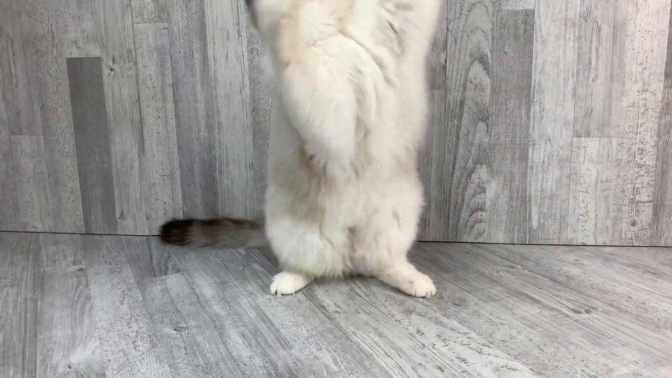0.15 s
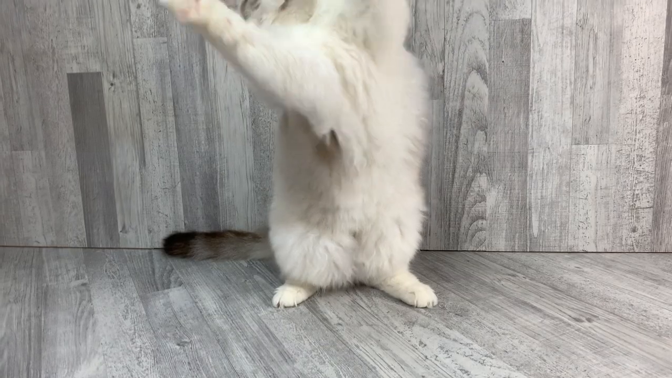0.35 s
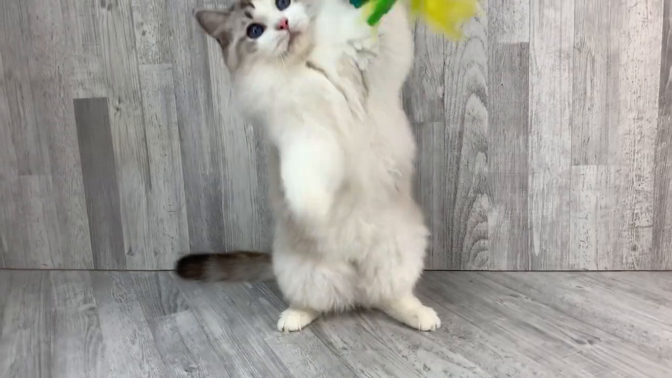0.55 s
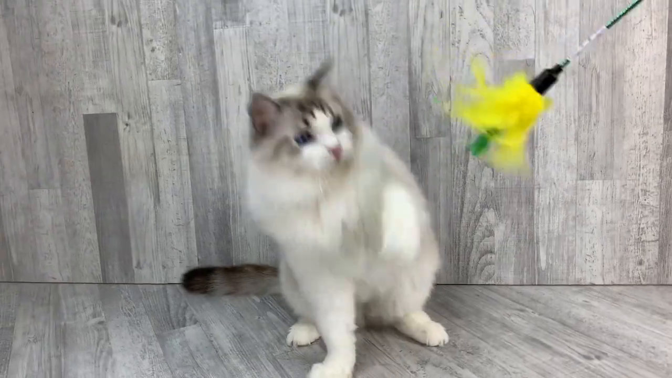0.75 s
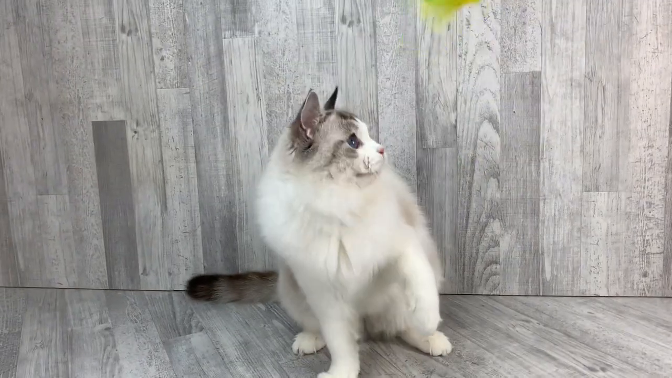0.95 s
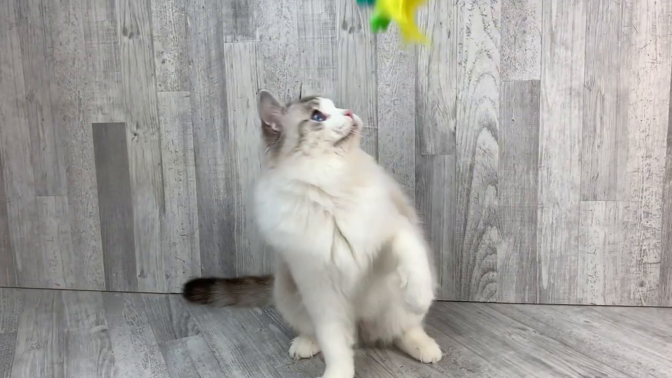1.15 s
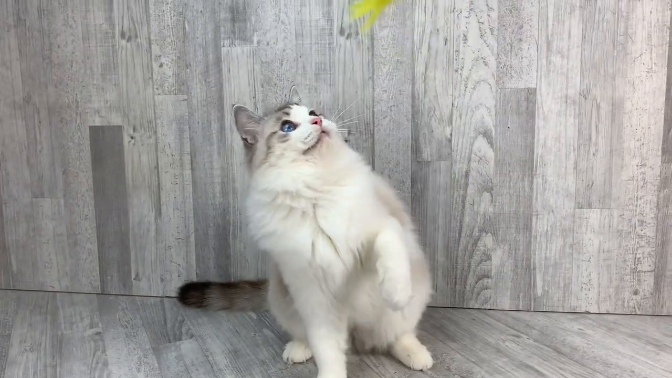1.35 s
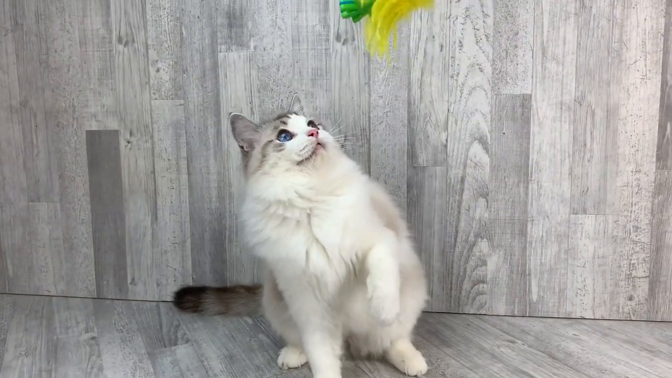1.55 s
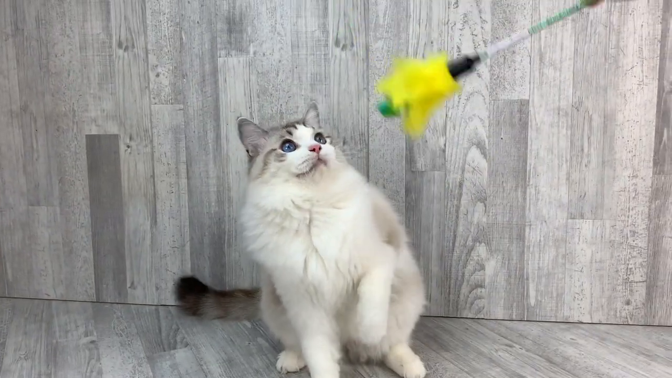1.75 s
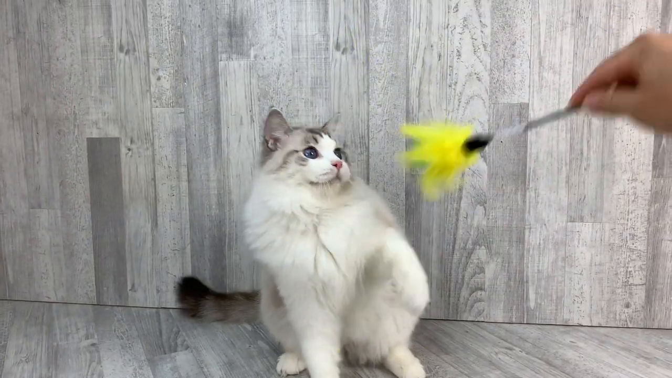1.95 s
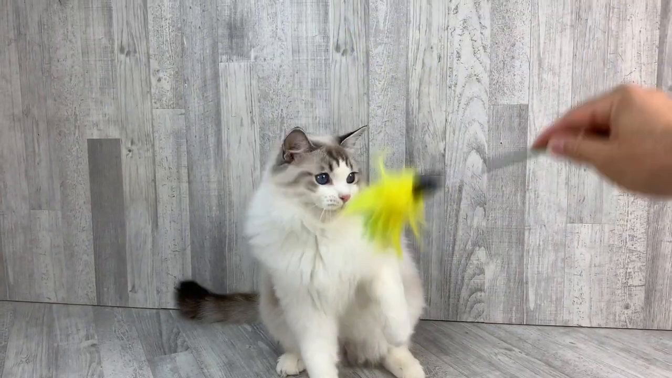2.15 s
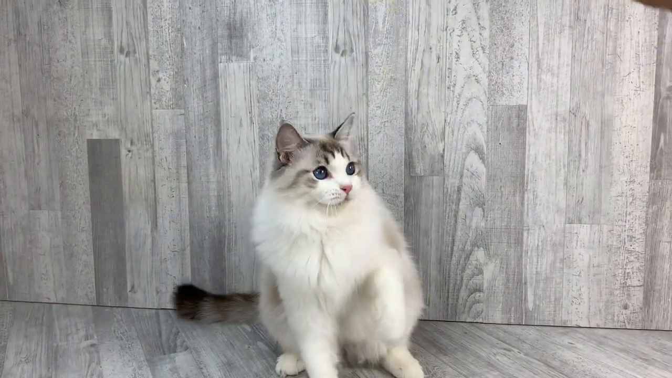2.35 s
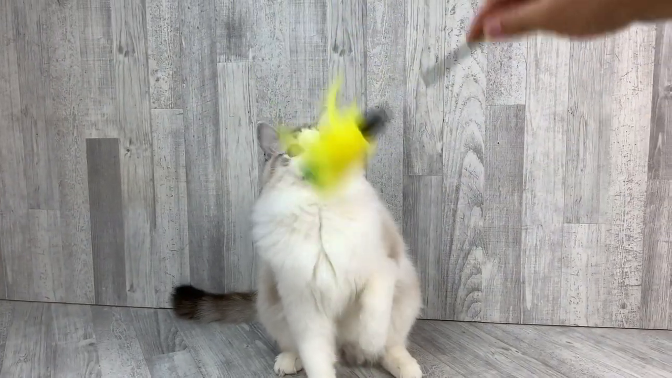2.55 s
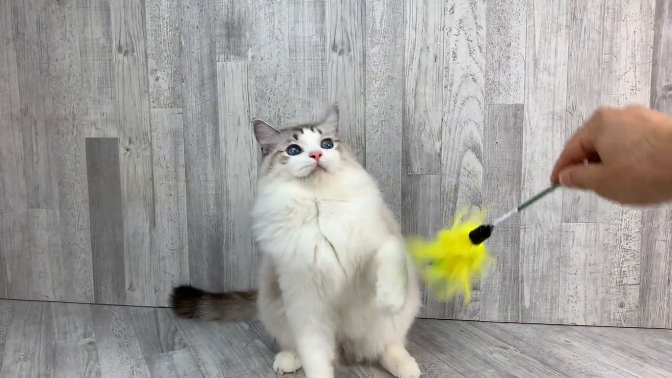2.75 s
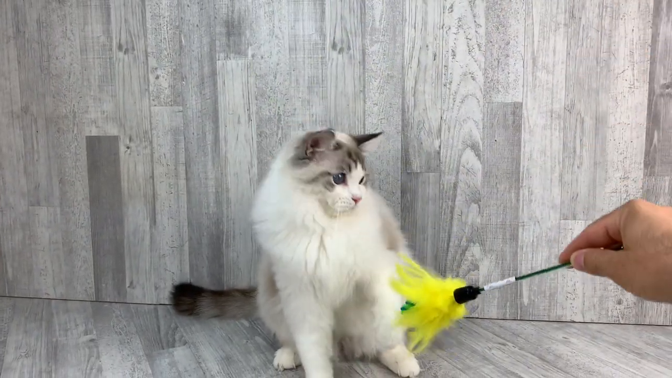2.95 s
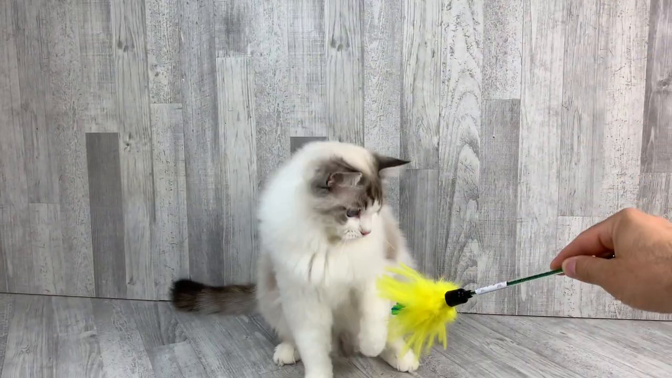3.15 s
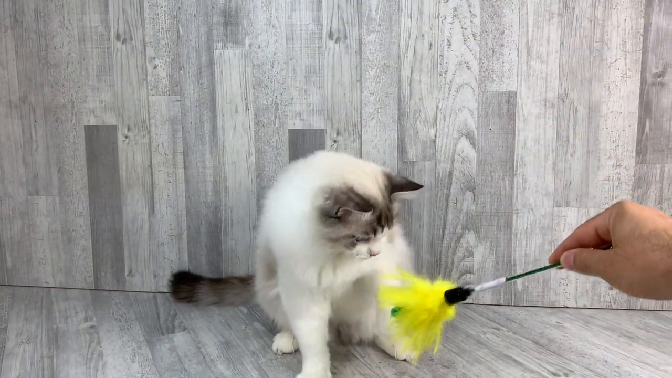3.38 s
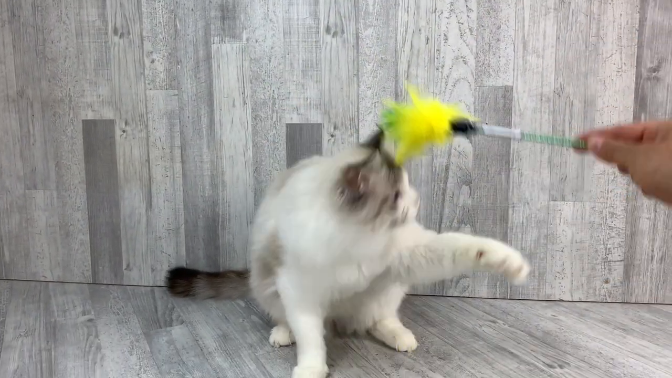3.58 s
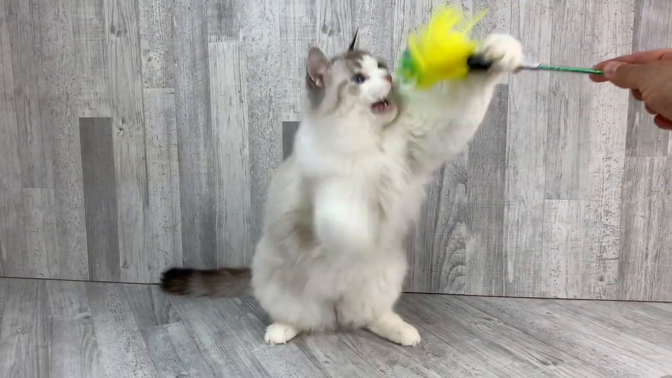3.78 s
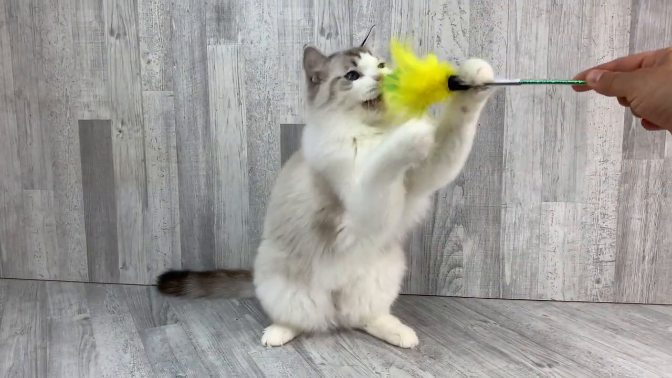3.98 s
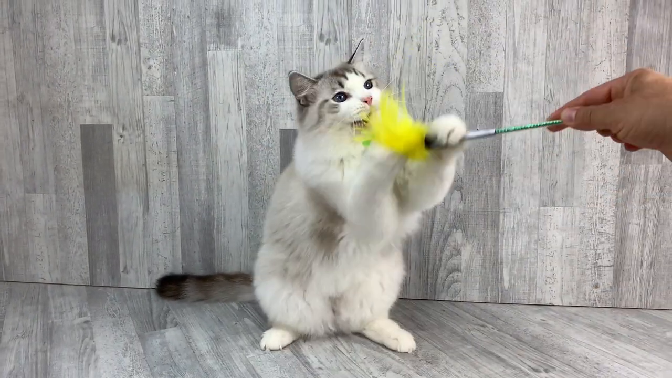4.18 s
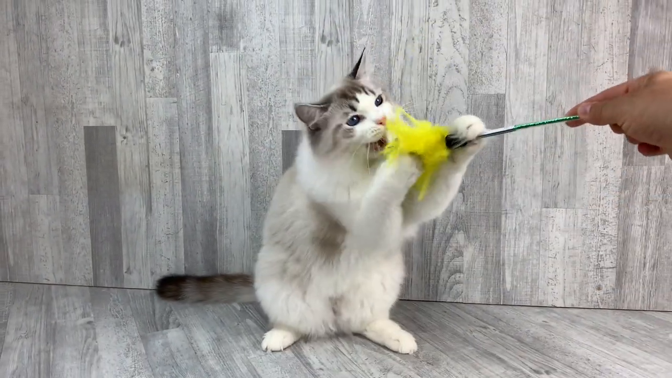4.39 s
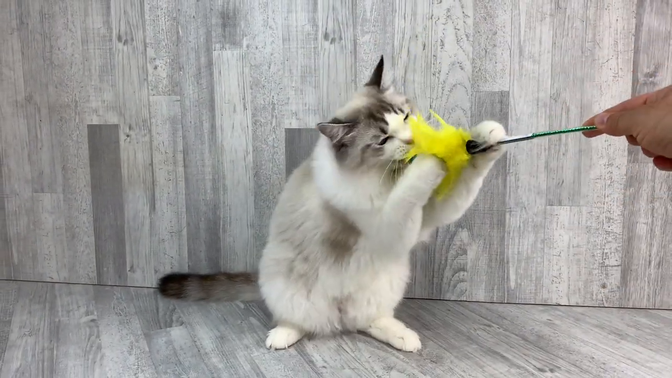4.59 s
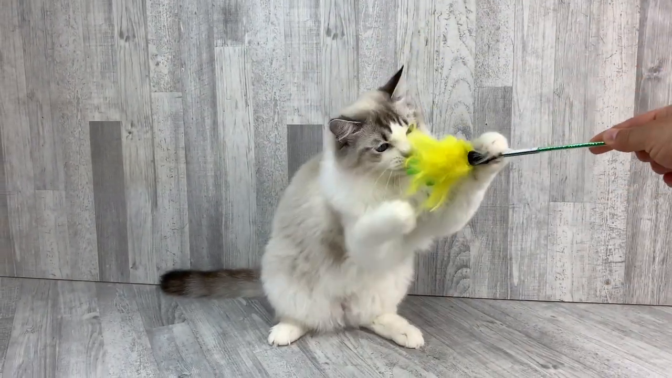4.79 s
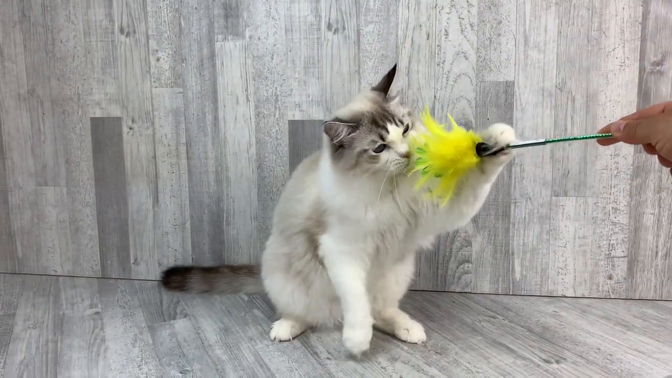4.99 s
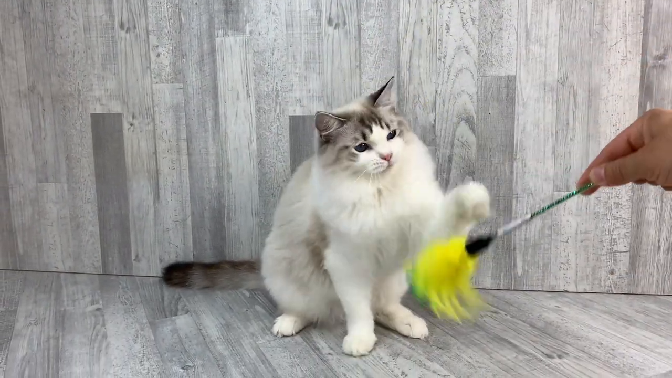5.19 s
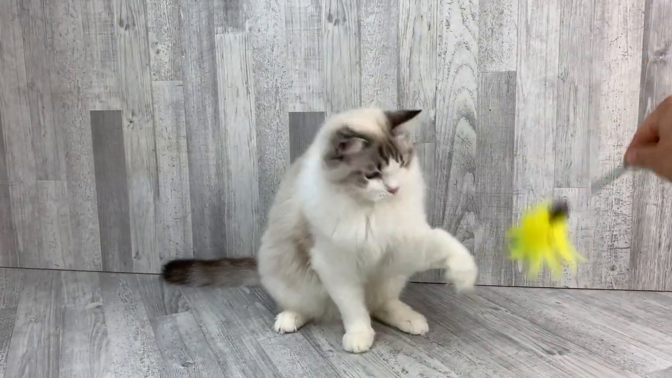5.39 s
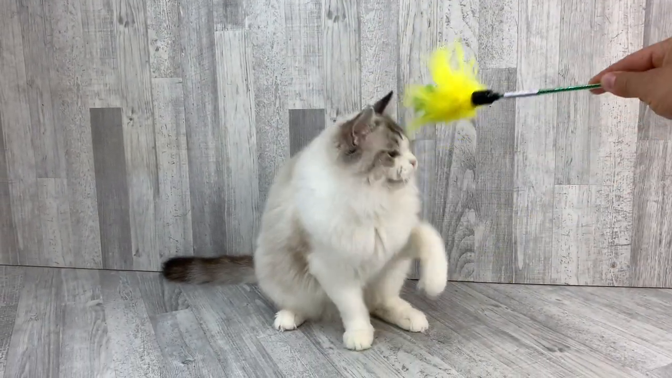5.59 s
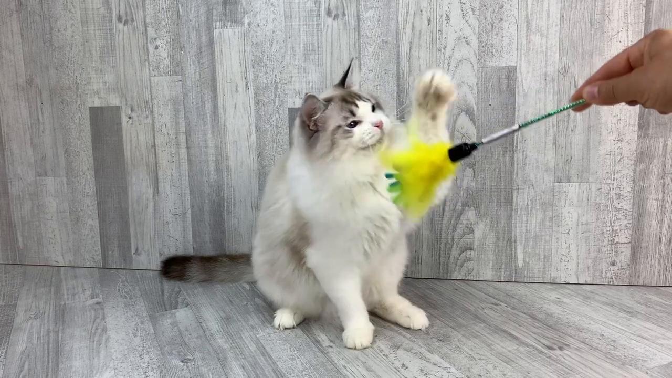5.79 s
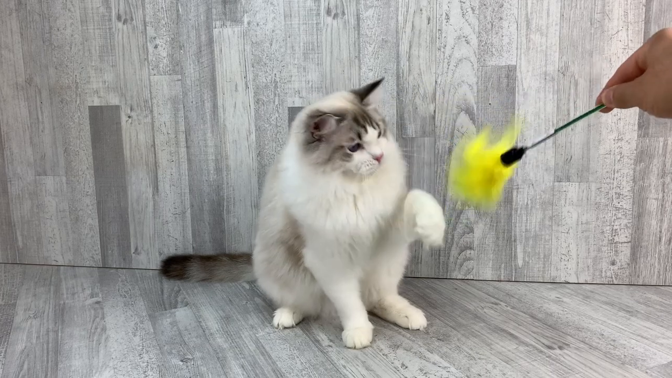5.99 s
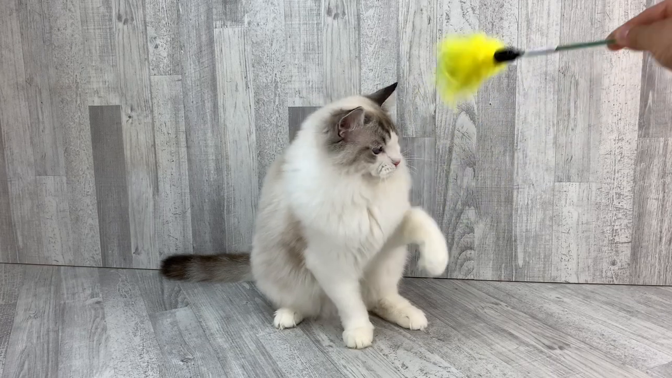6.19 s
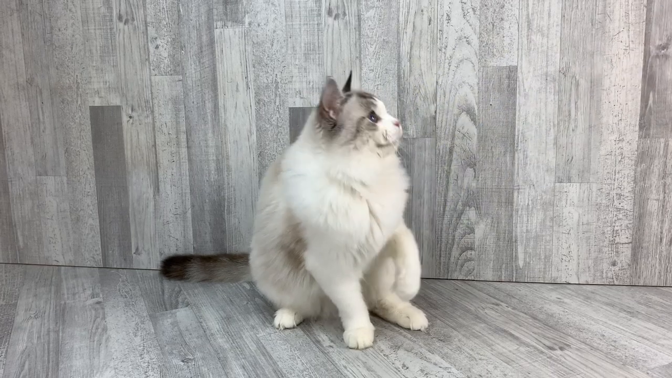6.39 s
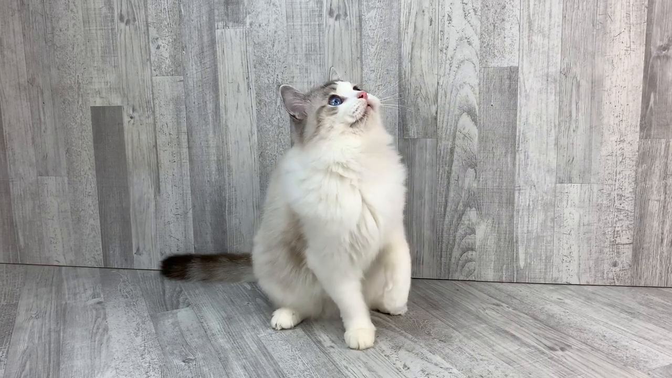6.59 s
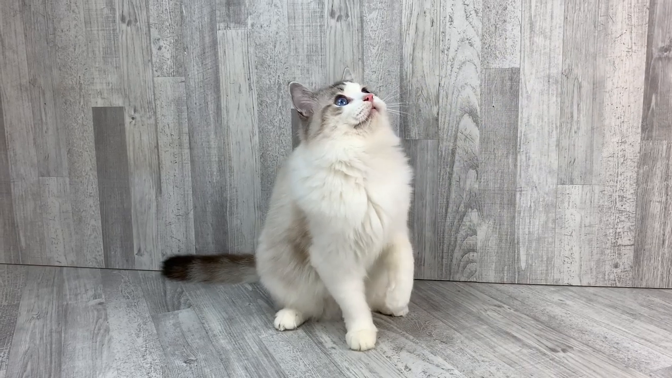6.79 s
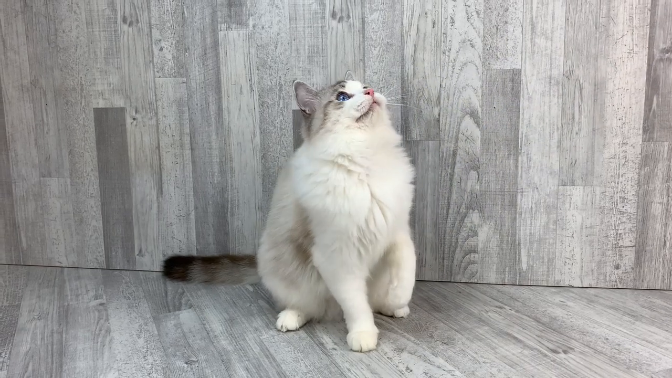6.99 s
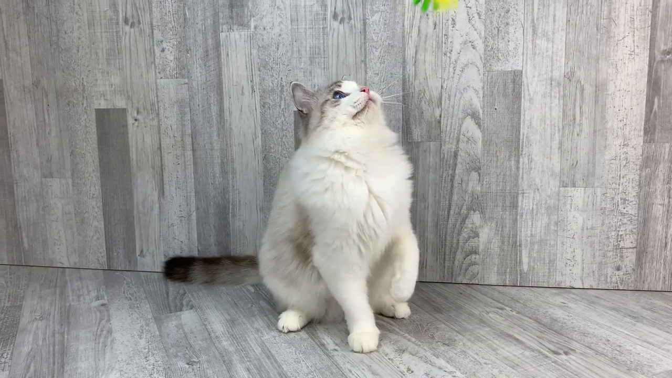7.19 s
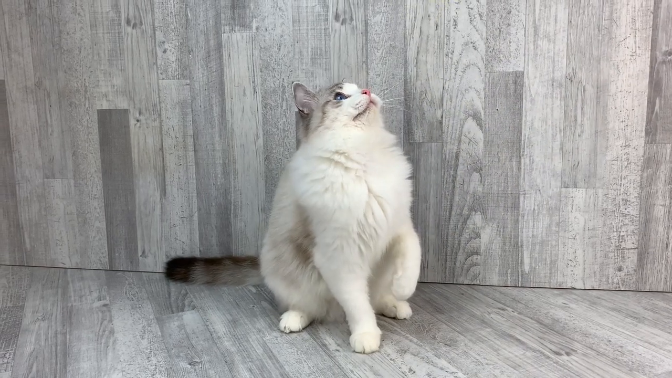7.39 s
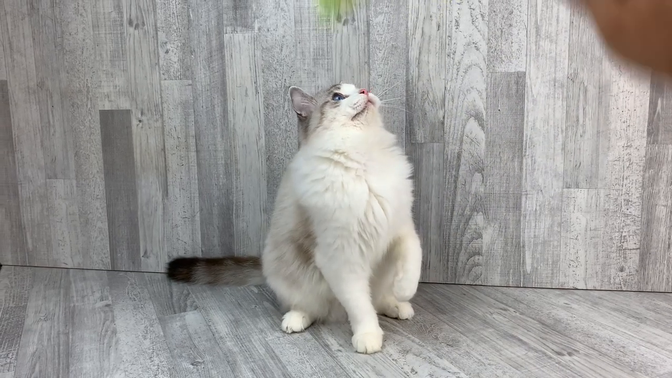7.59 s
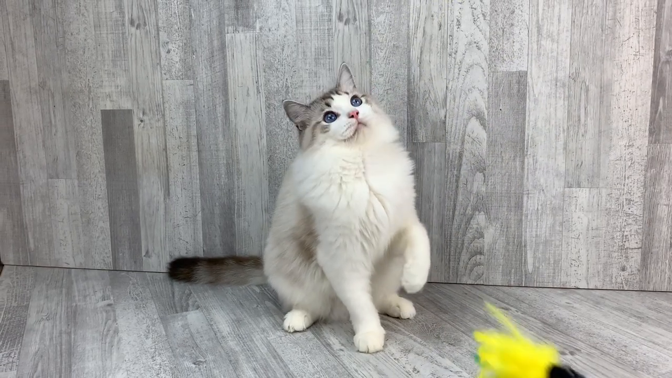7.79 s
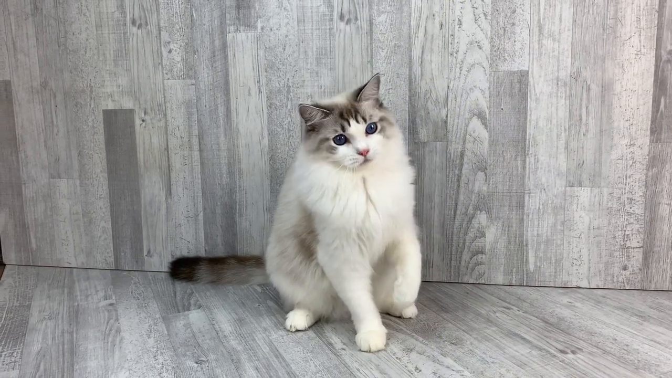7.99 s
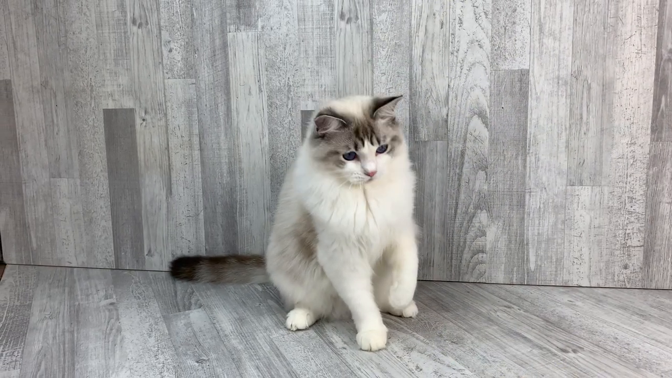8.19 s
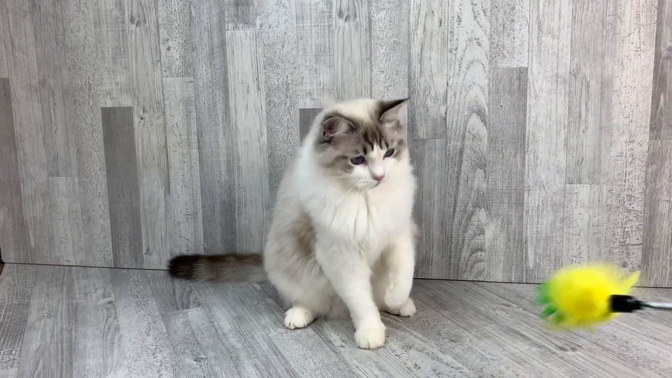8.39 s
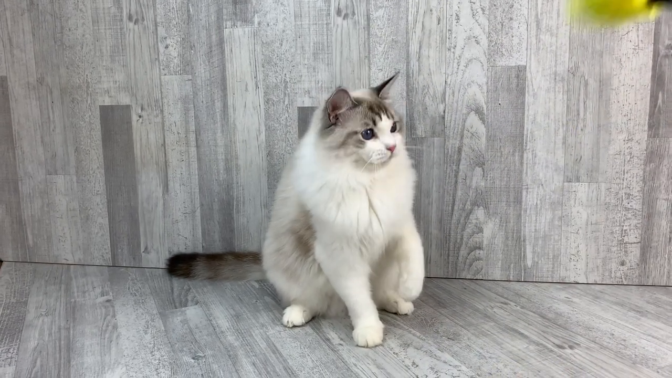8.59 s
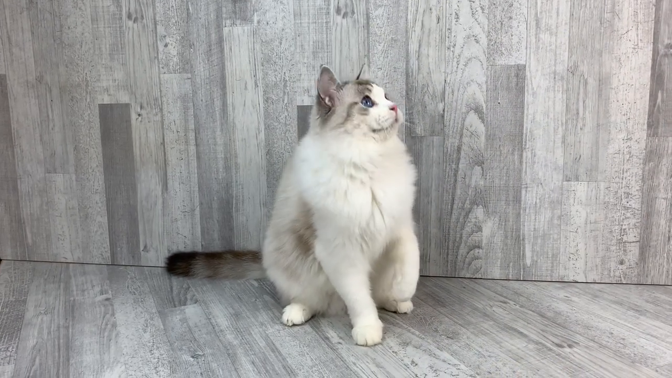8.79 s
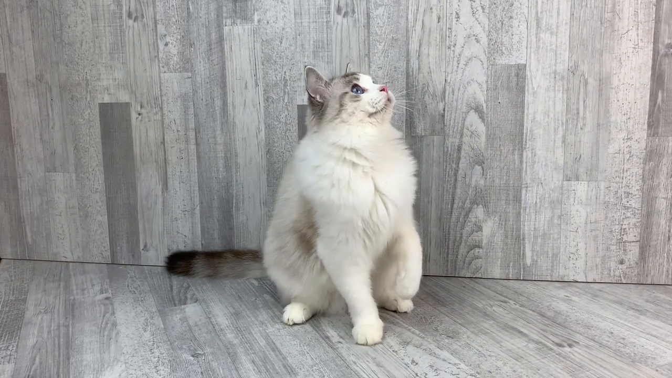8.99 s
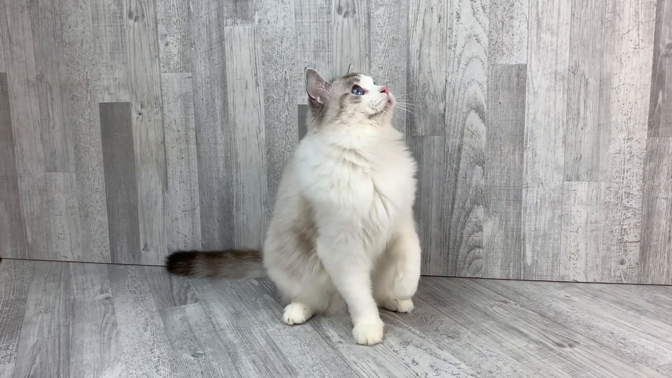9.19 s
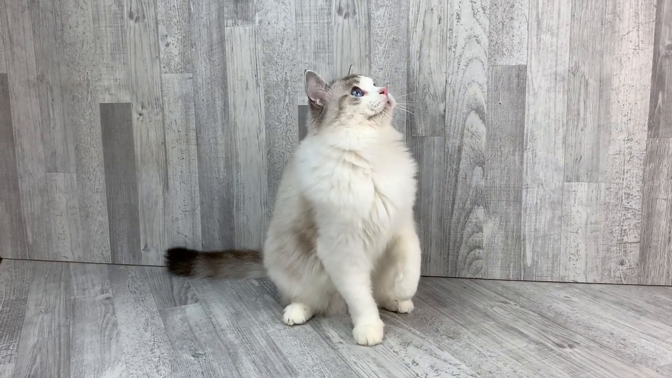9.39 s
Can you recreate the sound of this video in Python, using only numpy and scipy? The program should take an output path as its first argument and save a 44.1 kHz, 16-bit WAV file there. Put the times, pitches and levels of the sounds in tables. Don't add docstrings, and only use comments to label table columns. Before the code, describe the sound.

Bright, dry plastic clicks come in fast, uneven runs separated by small pauses. An early paw thud lands softly on the boards; around the middle, the clicks turn sparse and faint as the toy is held, then resume crisply. A short feather swish precedes the last bout. Very low house hum and a small room's quick reflections surround the close stereo pickup.

```python
import sys
import numpy as np
from scipy import signal
from scipy.fft import rfft, irfft
from scipy.io import wavfile
from scipy.ndimage import uniform_filter1d, minimum_filter1d

SR = 44100
rng = np.random.default_rng(int(sys.argv[2]) if len(sys.argv) > 2 else 0)


def dump(signal):
    limited = np.clip(np.atleast_2d(signal).T, -1, 1)
    pcm = np.round(limited * 32767).astype(np.int16)
    wavfile.write(sys.argv[1], SR, pcm)


def invert_db(level):
    return 10 ** (np.asarray(level, dtype=float) / 20)


N = 416744

# time in seconds, level in dB.
FLOOR_RUMBLE = [(0.0, -63), (0.5, -74), (0.55, -62), (0.73, -66.5), (0.839, -47.5), (1.42, -79.5),
                (3.45, -72.5), (3.79, -60.5), (5.0, -80), (5.161, -67.5), (5.53, -81.5), (5.69, -66),
                (6.421, -83), (6.55, -63.5), (7.37, -86.5), (7.68, -69), (8.29, -80), (9.45, -80.5)]
# centre in Hz, width in Hz.
HUM_BANDS = [(107, 3), (166, 35)]
# start in seconds, length in seconds, low hum in dB, upper hum in dB.
HUM_SWELLS = [
    (1.451, 0.675, -92.5, -75.5),
    (2.92, 1.66, -68.5, -76.5),
    (3.346, 0.818, -60.5, -63.5),
    (4.605, 0.96, -88, -73),
    (7.504, 0.339, -88.5, -73),
    (7.899, 0.27, -93.5, -71.5),
    (9.048, 0.198, -92, -74.5),
    (2.745, 0.305, -71.5, -75),
]
# start in seconds, length in seconds, level in dB.
SLEEVE_MOVES = [(0.05, 0.205, -74.5), (.7, 0.362, -62.5), (.85, 0.607, -70.5), (2.0, 0.367, -68.5),
                (2.3, 0.436, -76), (2.75, .32, -73), (3.25, 0.29, -91), (7.1, 0.68, -89),
                (3.65, 0.37, -64.5), (5.1, 0.279, -61), (5.25, 0.6, -78), (5.7, 0.68, -65.5),
                (6.8, 0.407, -75), (7.55, 0.421, -70), (7.95, 0.0953, -58.5), (8.4, 0.404, -71.5)]
# frequency in Hz, density in dB per Hz.
AIR_COLOUR = [(240, -41), (400, -15.5), (474, -16), (520, -13), (616, -10), (826, -19.5), (964, -15),
              (1560, -13.5), (9180, -24.5), (11000, -17.5), (16000, -35.5)]
# start in seconds, level in dB, pitch in Hz.
THUDS = [
    (0.538, -56.5, 53.2),
    (0.779, -49, 212),
    (0.8, -42, 77),
    (0.835, -46, 75.52),
    (5.15, -53, 83.4),
    (5.681, -51.5, 47.2),
    (6.629, -55, 65.5),
]
# start in seconds, level in dB, pitch in Hz.
HANDLE_JOLTS = [(2.081, -60.5, 374), (3.88, -49.5, 304), (5.205, -47, 168.3), (5.34, -46.5, 275),
                (5.571, -56.5, 287), (5.949, -50, 176), (6.013, -48.5, 358), (6.077, -48, 277),
                (7.964, -49.5, 266), (7.965, -50.5, 510), (8.493, -50, 240)]
# start in seconds, length in seconds, level in dB.
FEATHER_STROKES = [
    (8.22, 0.07, -52.5),
    (8.275, 0.078, -62),
    (4.6, 0.41, -99),
    (1.74, 0.12, -81),
    (4.7, 0.094, -73.5),
]
# frequency in Hz, density in dB per Hz.
FEATHER_COLOUR = [(240, -40.5), (400, -45.5), (512, -4), (1420, -26), (2250, -7), (4650, -7.5),
                  (16000, -24)]
# frequency in Hz, t60 in seconds.
ROOM_T60 = [(400, 0.47), (1500, 0.3082), (4000, 0.3254), (10000, 0.2465), (16000, 0.22)]
# delay in seconds, level in dB.
WALL_ECHOES = [
    (.0045, -10),
    (.008, -7.5),
    (0.012, -12),
    (0.023, -7),
    (.034, -18),
]
# frequency in Hz, correlation from 0 to 1.
PORT_LIKENESS = [(60, 0.96), (300, 0.85), (650, 0.6), (1000, 0.12), (1600, 0.12), (6000, 0.17)]
# frequency in Hz, gain re left in dB.
RIGHT_PORT = [(400, -0.5), (1300, -2), (2500, 1), (4200, 1.5), (5300, 5), (6500, 3.5)]
# frequency in Hz, level in dB.
CLACK_COLOUR = [(300, -47), (700, -22.5), (1200, -19.5), (2200, -8.5), (4200, -7), (7000, -7.5),
                (9000, -1.5), (11000, -5.5), (12600, -2), (13300, -3), (15500, -5), (16200, -22.5),
                (17000, -66)]
# start in seconds, blow in dB, then body,
# stem and shell in dB re the treble.
WAND_BLOWS = [(0.0001, -29, -23.5, -14.5, -10), (0.0727, -28, -28, -25.5, -11),
              (0.1408, -15, -25, -12.5, -7), (0.2121, -18.5, -23, -15, -11),
              (0.2913, -27.0, -30.5, -22, -16.5), (0.3623, -20.5, -28, -20, -11.5),
              (0.4357, -21.5, -26.5, -18.5, -14), (0.513, -22.5, -33, -24, -11),
              (0.5711, -27.5, -30, -23, -15), (0.6427, -23, -30, -23, -11.5),
              (0.704, -17.5, -24.5, -18, -9.5), (0.7334, -46, -17.5, -5, -5.0),
              (0.7526, -31.5, -12.5, -5, -2.5), (0.7685, -25.5, -26, -22, -6.5),
              (0.8002, -31.5, -26.5, -14.5, -9), (0.8277, -22.5, -21.5, -12.5, -9.5),
              (0.8913, -17.5, -22, -12.0, -8.5), (0.948, -15.5, -22.0, -9, -9.5),
              (1.0101, -21, -20.5, -11, -6), (1.0732, -15, -26, -16, -10), (1.135, -19, -24, -13.5, -10.5),
              (1.1937, -22.5, -18.5, -11, -7.5), (1.2596, -22.0, -23.5, -16.5, -10),
              (1.3128, -27.5, -31, -24.5, -9.5), (1.3878, -27.5, -32.5, -20, -10.5),
              (1.4374, -29, -28, -18, -14), (1.496, -51.5, -18.5, -22, -14),
              (1.521, -49.5, -29.5, -26, -13), (1.6022, -69, -22, -23.5, -16.5),
              (1.8234, -45.5, -27.5, -23, -6.5), (1.9013, -47, -29.5, -24, -16),
               (1.9245, -48.5, -33.5, -22, -9.5), (2.0092, -31.5, -25, -17, -11.5),
               (2.0822, -21.5, -19.5, -10.5, -8.5), (2.1516, -22.5, -26, -16.5, -8.5),
               (2.2157, -17, -30, -20.5, -7.5), (2.2779, -27.5, -26.5, -22.0, -12.5),
               (2.3585, -18.5, -25, -17.0, -10.5), (2.4135, -29, -25, -21.5, -8.5),
               (2.485, -18.5, -25.5, -14.0, -8), (2.5565, -14.5, -23.5, -15.5, -14),
               (2.6249, -20, -26, -16.5, -17.5), (2.7012, -34, -42.5, -36, -9.5),
               (2.8112, -28, -30.5, -18.5, -8), (2.8732, -18, -31.5, -26, -13),
               (2.9163, -32, -31.5, -21, -10.5), (2.9793, -41, -23, -22, -14.5),
               (3.0059, -42, -32, -23, -13),
              (3.5279, -39.5, -26.5, -26, -14), (3.5558, -49, -16.5, -15, -4.5),
               (3.5864, -43, -19, -16.5, -12), (3.6615, -18, -28.5, -20, -12.5),
               (3.7301, -21.5, -17.5, -8.5, -4), (3.7959, -25, -29.5, -22.5, -7),
               (3.8203, -36, -34, -14, -5.5), (3.8368, -19.5, -26.5, -17.5, -8),
               (3.8817, -23, -15.5, -9, -10), (3.9841, -39, -33, -36, -7), (4.0805, -33.5, -24, -22, -6.5),
               (4.162, -37.0, -24, -17, -6.5), (4.2166, -36, -22, -17, -9.5),
               (4.2644, -36.5, -17.0, -19.0, -7.5), (4.27, -31.5, -34, -22, -15),
               (4.4017, -61.0, -22.0, -25.5, -5), (4.6166, -60.5, -11, -10.0, -1),
               (4.696, -51.5, -23.5, -23, -4), (4.798, -46.5, -28, -22.5, -13.5),
               (4.8538, -54.5, -16.5, -24.5, 2.5), (4.8678, -56.5, -24.5, -24, -17),
              (5.1536, -64.5, -6.5, 9, 10.5), (5.162, -26.5, -23.5, -11, -6),
              (5.2059, -22, -23.5, -12, -2.5), (5.2767, -23.0, -26.5, -20.5, -11.5),
              (5.3413, -16.5, -29, -17.5, -6), (5.4043, -20.5, -22, -10, -8),
              (5.4473, -31.5, -28, -25.5, -14.5), (5.5058, -18, -26.5, -15.5, -13.5),
              (5.5719, -17, -26.5, -19.5, -8.5), (5.6246, -36.5, -31.5, -21, -29),
              (5.7021, -31.5, -32.5, -21.5, -14.5), (5.7718, -25.5, -27.5, -22, -7.0),
              (5.8366, -28, -23.5, -22, -11), (5.9084, -30, -25, -16, -13),
              (5.9301, -39.5, -20.5, -26, -8.5), (5.9508, -26, -24, -17.5, -10.5),
              (6.013, -18, -34, -24, -13.5), (6.0772, -19.0, -26.5, -17, -2.5),
              (6.1426, -19, -20.5, -11, -6.5), (6.2087, -17, -23, -10.5, -11),
              (6.2702, -16.5, -27, -16.5, -16), (6.336, -34, -34.5, -19.5, -10.5),
              (6.4119, -23.5, -28.5, -22, -12.5), (6.4722, -27.5, -30.5, -19.5, -10),
              (6.5324, -39, -27.0, -33.5, -9), (6.5989, -42.5, -27.5, -19, -5.5),
              (6.655, -48.5, -19.5, -19.5, -11),
              (6.815, -46.0, -28, -22, -12.5), (6.8853, -17, -29, -19.5, -15),
             (6.9426, -18, -23.5, -12.5, -10), (6.9938, -17.5, -31.5, -19, -8),
             (7.054, -14, -23.5, -17, -16), (7.1158, -15.5, -22.5, -13.5, -13),
             (7.178, -26.5, -23.0, -18.5, -5.5), (7.229, -28, -31, -19.5, -9),
             (7.2935, -26.5, -23.5, -17, -10), (7.3373, -27, -22.5, -17, -9.5),
             (7.3986, -26.5, -23, -18.5, -8.5), (7.4353, -35.5, -34.5, -23.5, -6),
             (7.529, -25.5, -24, -20, -13), (7.6438, -21, -26.5, -14.5, -11),
             (7.7158, -22.5, -27.5, -25, -13.5), (7.7861, -28, -28.5, -17.5, -14.0),
             (7.8648, -24.5, -28, -23, -13), (7.91, -33.5, -28, -20, -8), (7.962, -41, -18.5, -6, -3.5),
             (7.9716, -41.5, -19, -17.5, -3), (8.0163, -78, -5.5, -8.5, 2.5),
              (8.4176, -34.5, -27.5, -22.5, -8), (8.4958, -16.5, -31, -21, -9.5),
             (8.5528, -16, -29, -17, -6.5), (8.6115, -25, -28.5, -22, -9), (8.63, -34.5, -31.5, -30, -14.5),
             (8.6658, -27, -31.5, -21.5, -5.5), (8.6868, -31.5, -25.5, -19.5, -18),
             (8.7268, -18.5, -30.5, -18.5, -9), (8.7779, -18.5, -21, -10, -10.5),
             (8.837, -14.5, -22.5, -9.5, -10.5), (8.8932, -25, -27.5, -19, -9.5),
             (8.9436, -24, -22.5, -13.5, -5), (9.3099, -57, -33, -26.5, -11.5),
             (9.4031, -30.5, -28, -28.5, -9), (9.4292, -37.5, -24.5, -17.5, -7.5)]
# time in seconds, level in dB re the blow's first
BLOW_REBOUNDS = [(0.075, 0), (0.0772, -2), (0.1429, -4), (0.1442, -3), (0.1457, -6.5), (0.2137, -1),
                 (0.2154, -4), (0.2162, -11.5), (0.2203, -5.5), (0.2938, -4.5), (0.2934, 6.5),
                 (0.3628, -1.5), (0.3634, -5), (0.4375, -5), (0.515, 0.5), (0.571, 6), (0.646, -4.5),
                 (0.7046, 5.5), (0.7706, 0.5), (0.828, -1.5), (0.828, -6.5), (0.831, -7.5), (0.8926, 8),
                 (0.8936, 4), (0.8948, 4.5), (0.8965, 1), (0.9491, -3.5), (0.9496, -7), (0.9531, -6),
                 (1.0122, -3.5), (1.0744, -8), (1.076, -4), (1.0795, -6.5), (1.1358, -6.5), (1.1365, -1),
                 (1.14, -3.5), (1.1944, -0.5), (1.1957, -6), (1.2603, -9.5), (1.2636, 0.5), (1.3908, -8),
                 (2.0863, 0.5), (2.0886, -0.5), (2.156, -6), (2.216, 3), (2.2178, 4.5), (2.2201, 7.5),
                 (2.2208, 4), (2.223, -4.5), (2.36, 0), (2.4855, -2), (2.4881, -17.5), (2.4876, -17),
                 (2.4882, -9.5), (2.556, 0),
                 (2.5576, -1.5), (2.5574, -1), (2.5609, -5.5), (2.5661, -4), (2.6257, -3.5), (2.8104, -2),
                   (2.8741, 12), (3.6605, -7.5), (3.6631, -6), (3.7307, -4), (3.7331, 18), (3.7364, -10.5),
                   (3.736, 4), (3.7987, 4.5), (3.8, 1), (3.8368, -15.5), (3.8376, -9), (3.8389, -2.5),
                   (3.8435, -4), (3.8826, 3), (3.884, -16.5), (5.1637, -4.5), (5.2104, -5.5),
                   (5.2135, -11.5), (5.2804, 5.5), (5.3442, 17), (5.3473, -4), (5.3488, 4.5), (5.4068, -13),
                   (5.5039, 20), (5.507, 32), (5.5113, 3), (5.5135, 1.5), (5.5728, -0.5), (5.575, 2.5),
                   (5.5737, -10), (5.5758, 7), (5.5783, -2.5), (5.5794, -10.5), (5.7758, -9.5),
                   (5.7748, -7), (6.0157, -3.5), (6.0808, 16), (6.083, -20.5), (6.0826, -15.5),
                   (6.1432, 4.5), (6.1442, -3.5), (6.2105, -3), (6.272, 7), (6.2744, -15), (6.2734, -5.5),
                   (6.413, 5.5), (6.4151, 0.5), (6.4182, 1), (6.475, 2),
                 (6.8859, -10), (6.8901, -12.5), (6.8917, -7), (6.8922, -1.5), (6.9453, 4), (6.9474, 11),
                 (6.9478, 5), (6.9466, -9.5), (6.948, -0.5), (6.9956, -7.5), (6.996, -8), (6.997, 1),
                 (6.999, -1), (7.0001, 1.5), (7.0578, 0), (7.0588, -14.5), (7.0574, -4.5), (7.0606, -0.5),
                 (7.1169, 1.5), (7.1196, 0), (7.2271, 2), (7.2945, -7), (7.2952, -2.5), (7.3381, -7),
                 (7.4005, -2), (7.5359, -2), (7.6442, -4), (7.6467, 0.5), (7.6469, -11), (7.6474, 1.5),
                 (7.65, -1.5), (7.651, -4.5), (7.7173, 4), (7.7187, -1.5), (7.785, 0), (8.4989, 6),
                 (8.4979, 0), (8.5008, -10.5), (8.5016, -6.5), (8.5025, -6.5), (8.5557, 3.5), (8.6147, -4),
                 (8.6688, 3), (8.73, -6), (8.7315, 0.5), (8.779, -4.5), (8.7822, -2), (8.7809, 8),
                 (8.7821, -4.5), (8.8383, 5), (8.8376, 2.5), (8.8414, -6), (8.844, -10.5), (8.898, 5.5),
                 (8.9475, -1.5)]
# four centres in Hz, five borders in Hz.
ZONE_CENTRES_HZ = [1300, 3100, 5600, 8200]
ZONE_EDGES_HZ = [600, 1900, 4250, 7500, 16500]
BEAMED_DB = (-0.5, -1, -3.5, -0.98)
SPREAD_DB = (-0.3259, -0.07, -3, -3.11)


def evened(x):
    return x / np.sqrt(np.mean(x ** 2) + 1e-20)


def read(points, hz):
    f, value = np.transpose(points)
    return np.interp(np.log(hz + 1), np.log(f + 1), value)


def bump(hz, centre_hz, width_hz):
    return np.exp(-((hz - centre_hz) / width_hz) ** 2)


def add(mix, s, sound):
    part = mix[..., round(s * SR):][..., :sound.shape[-1]]
    part += sound[..., :part.shape[-1]]


def swells(rows, rest_db):
    level = np.full(N, invert_db(rest_db))
    for s, length_s, db in rows:
        add(level, s, invert_db(db) * np.hanning(round(length_s * SR)))
    return level


def causal(db):
    log_gain = np.log(invert_db(np.maximum(db, -100)))
    circle = np.concatenate([log_gain, log_gain[..., -2:0:-1]], axis=-1)
    phase = signal.hilbert(circle, axis=-1).imag[..., :log_gain.shape[-1]]
    return np.exp(log_gain - 1j * phase)


def pair(gain):
    hz = np.fft.rfftfreq(N, 1 / SR)
    left, other = rfft(rng.standard_normal((2, N)))
    same = np.clip(read(PORT_LIKENESS, hz), 0, 1)
    right = same * left + np.sqrt(1 - same ** 2) * other
    return evened(irfft(np.array([left, right]) * gain(hz), N))


def house():
    rumble = invert_db(np.interp(np.arange(N) / SR, *np.transpose(FLOOR_RUMBLE)))
    out = rumble * pair(lambda hz: (hz / 60) ** 2 / (1 + (hz / 72) ** 6))
    low = swells([(s, length_s, db) for s, length_s, db, _ in HUM_SWELLS], -82)
    upper = swells([(s, length_s, db) for s, length_s, _, db in HUM_SWELLS], -77)
    for (centre_hz, width_hz), level in zip(HUM_BANDS, (invert_db(-8.5) * low, upper)):
        out += level * pair(lambda hz: 1 / (1 + ((hz - centre_hz) / width_hz) ** 2) ** 2)
    fur = swells(SLEEVE_MOVES, -79.5)
    out += fur * pair(lambda hz: (hz / 220) ** 4 / (1 + (hz / 240) ** 6.006))
    out += invert_db(-3.5) * fur * pair(lambda hz: 1 / (1 + ((hz - 165) / 30) ** 2))
    idle_hz, loaded_hz, tone_db = 103.5, 107, -3.2
    tone_hz = idle_hz + (loaded_hz - idle_hz) * np.sqrt(low / low.max())
    out += invert_db(tone_db) * low * np.sqrt(2) * np.sin(2 * np.pi * np.cumsum(tone_hz) / SR)
    add(out, 4.68, far_motor())
    air_db = -82.5
    return out + invert_db(air_db) * pair(lambda hz: invert_db(read(AIR_COLOUR, hz)) * (hz > 400))


def far_motor(length_s=0.3, whine_hz=316, level_db=-71):
    t = np.arange(round(length_s * SR)) / SR
    return invert_db(level_db) * np.sin(2 * np.pi * whine_hz * t) * signal.windows.tukey(len(t), .6)


def thuds():
    out, t = np.zeros(N), np.arange(SR // 5) / SR
    for rows, swing_s in ((THUDS, 0.014), (HANDLE_JOLTS, .003)):
        for s, db, hz in rows:
            swing = t * np.exp(-t / swing_s) * np.sin(2 * np.pi * hz * t)
            add(out, s, invert_db(db - 1.0) * swing / abs(swing).max())
    return out


def swishes():
    grain_db = 3.5 * np.tanh(evened(uniform_filter1d(rng.standard_normal(N), size=300)))
    rub_level = swells([(3.5, 0.9, -66)], -120) if RUB_FORWARD else swells([], -120)
    rub = rub_level * pair(lambda hz: bump(hz, 1146, 347.5))
    hiss = pair(lambda hz: invert_db(read(FEATHER_COLOUR, hz)))
    return rub + swells(FEATHER_STROKES, -110) * invert_db(grain_db) * hiss


RUB_FORWARD = False


def room(x, tail_db=-4.5, walls_db=-7.0, rise_s=0.0047):
    size = SR // 2
    t = np.arange(size) / SR
    taps = np.zeros((2, size))
    at = np.arange(40, size - 12, 12) + rng.integers(0, 12, (2, (size - 41) // 12))
    np.put_along_axis(taps, at, rng.choice([-1., 1.], at.shape), 1)
    taps *= 1 - np.exp(-(t / rise_s) ** 2)
    far_wall_s, spread_s, far_wall_db = 0.019, 0.0025, 1.4
    taps *= invert_db(far_wall_db * bump(t, far_wall_s, spread_s))
    hz, frame_s, z = signal.stft(taps, SR, nperseg=128)
    same = np.clip(read(PORT_LIKENESS, hz), 0, 1)[:, None]
    z[1] = same * z[0] + np.sqrt(1 - same ** 2) * z[1]
    decay_db = -60 * frame_s / read(ROOM_T60, hz)[:, None]
    tail = signal.istft(z * invert_db(decay_db), SR, nperseg=128)[1]
    tail *= invert_db(tail_db) / np.linalg.norm(tail[0])
    for s, db in WALL_ECHOES:
        for side in tail:
            side[round(s * rng.uniform(.92, 1.08) * SR)] += invert_db(db + walls_db) * rng.choice([-1, 1])
    return signal.oaconvolve(x[None], tail, axes=1)[:, :N]


def hushed(x, knee_db=-56.5, slope=0.223):
    level_db = 10 * np.log10(abs(uniform_filter1d((x ** 2).mean(0), size=600)) + 1e-12)
    return x * invert_db(slope * np.minimum(level_db - knee_db, 0))


def levelled(spectra, zones_db, hz):
    blow_samples = 900
    shares = [read(np.transpose([ZONE_CENTRES_HZ, one]), hz) for one in np.eye(4)]
    for _ in range(3):
        gain_db = 0
        for share, zone_db, lo, hi in zip(shares, zones_db, ZONE_EDGES_HZ, ZONE_EDGES_HZ[1:]):
            energy = (abs(spectra) ** 2 * ((hz > lo) & (hz < hi))).sum(1, keepdims=True)
            gain_db = gain_db + share * (zone_db - 10 * np.log10(energy / len(hz) / blow_samples))
        spectra = spectra * invert_db(gain_db)
    return spectra


def rebounds(s, size, early):
    at_s, db = np.transpose(BLOW_REBOUNDS)
    blow = np.searchsorted(s[:, 0], at_s + .002) - 1
    hard = np.zeros((len(s), size))
    hard[blow, early + np.round((at_s - s[blow, 0]) * SR).astype(int)] = invert_db(db)
    return hard


def contacts(t, hard):
    dice, sizes = rng.random(hard.shape), rng.standard_normal(hard.shape)
    run_s = np.interp(dice[:, :1], [0, 1], (0.0041, 0.0083))
    fading = np.exp(-(abs(t) / run_s) ** 1.4) * (t > 0)
    scrape = sizes * (0.013 * np.exp(-abs(t) / 0.004) + 0.34 * np.exp(-abs(t) / 0.00036)) * (t < 0)
    chatter = (dice > 1 - 6000 / SR) * sizes * 0.2 * fading ** 0.58
    loose = np.where(hard.any(axis=1, keepdims=True), 0.12, 0.45)
    touches = (t == 0) + hard + loose * (dice < 1100 / SR) * abs(sizes) * fading
    bursts = signal.lfilter([1], [1, -np.exp(-1 / (0.00028 * SR))], touches)
    return scrape + chatter + 0.56 * touches + 0.3 * bursts * rng.standard_normal(hard.shape)


def shell_colour(s, body_db, hz):
    bright_hz, sink_hz_per_db, stray_hz = 10890, 72, 410
    peak_hz = bright_hz - sink_hz_per_db * (body_db - np.median(body_db))
    peak_hz = peak_hz + stray_hz * rng.standard_normal(s.shape)
    db = read(CLACK_COLOUR, hz) + 6.63 * bump(hz, peak_hz, 1300)
    held = (s > 3.95) & (s < 4.95)
    db = db + (3.2 + 2.5 * held) * bump(hz, 1100, 200)
    db = db + 1.6 * bump(hz, 5450, 1000)
    turning = rng.standard_normal((len(s), len(hz)))
    return db + 2.4 * evened(uniform_filter1d(turning, size=36, axis=1))


def clacks(count=5):
    bouts = WAND_BLOWS
    s, blow_db, body_db, stem_db, shell_db = np.transpose(bouts)[:, :, None]
    zones_db = blow_db + body_db, blow_db + stem_db, blow_db + shell_db, blow_db
    size, early = 2048, 600
    t, hz = (np.arange(size) - early) / SR, np.fft.rfftfreq(size, 1 / SR)
    hard = rebounds(s, size, early)
    ticks = contacts(t, hard)
    db = shell_colour(s, body_db, hz)
    modes = evened(uniform_filter1d(rng.standard_normal((len(s), len(hz))), size=9, axis=1))
    near = rfft(ticks) * causal(db + 3.4 * modes)
    near = levelled(near, [z + d for z, d in zip(zones_db, BEAMED_DB)], hz)
    far = rfft((t == 0) + 0.33 * hard) * causal(db + 2.2 * modes)
    far = levelled(far, [z + d for z, d in zip(zones_db, SPREAD_DB)], hz)
    late_s = 0.0002 * rng.standard_normal((len(s), 1))
    sounds = irfft(np.array([near, near * np.exp(-2j * np.pi * hz * late_s), far]))
    direct, sent = np.zeros((2, N + early)), np.zeros((count, N + early))
    for k in range(len(s)):
        add(direct, s[k, 0], sounds[:2, k])
        add(sent[k % count], s[k, 0], sounds[2, k])
    return direct[:, early:], sent[:, early:]


def scene():
    direct, sent = clacks()
    wand = hushed(direct + sum(room(x) for x in sent))
    return wand + house() + thuds() + swishes()


def masking_gate(x, size=6):
    mid_side = np.array([x[0] + x[1], x[0] - x[1]]) / 2
    hz, _, z = signal.stft(mid_side, SR, nperseg=1024, noverlap=512)
    band = np.arange(len(hz)) // size * size + size // 2
    power = uniform_filter1d(abs(z) ** 2, size=size, axis=1)[:, np.minimum(band, len(hz) - 1)]
    above = hz[:, None] > 2400
    loudest = (power * above).max(axis=(0, 1))
    under_other_db, under_loudest_db = -7.5, -22
    masked = power < power[::-1] * invert_db(under_other_db) ** 2
    masked |= power < loudest * invert_db(under_loudest_db) ** 2
    steady = loudest < 2 * np.roll(loudest, 1)
    kept = z * ~(masked & steady & above)
    mid, side = signal.istft(kept, SR, nperseg=1024, noverlap=512)[1][:, :N]
    return np.array([mid + side, mid - side])


def limited(x, ceiling=.96):
    crest = -minimum_filter1d(-abs(x).max(axis=0), size=201)
    return x / uniform_filter1d(np.maximum(crest / ceiling, 1), size=101)


def roll_off(x):
    return signal.sosfilt(signal.butter(12, 16980, fs=SR, output="sos"), x)


def record(dry):
    join_hz, join_width_hz = 6843, 1100
    lead_samples, phase_turns = 9, .25
    hz = np.fft.rfftfreq(N, 1 / SR)
    left, right = rfft(dry)
    treble = .5 + .5 * np.tanh((hz - join_hz) / join_width_hz)
    shifted = left * np.exp(2j * np.pi * (hz * lead_samples / SR - phase_turns))
    right = np.sqrt(1 - treble) * right * invert_db(read(RIGHT_PORT, hz)) + np.sqrt(treble) * shifted
    both = masking_gate(irfft(np.array([left, right]), N))
    return roll_off(limited(both))


dry = scene()
out = record(dry)
dump(out)
```